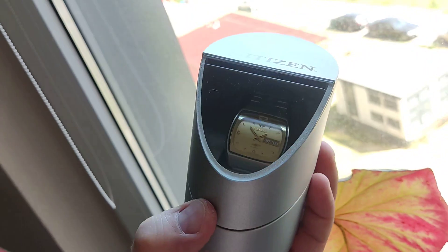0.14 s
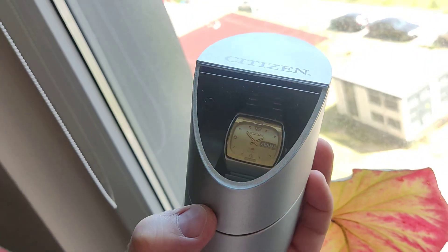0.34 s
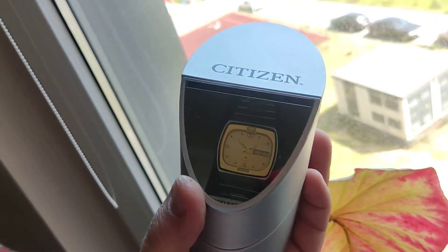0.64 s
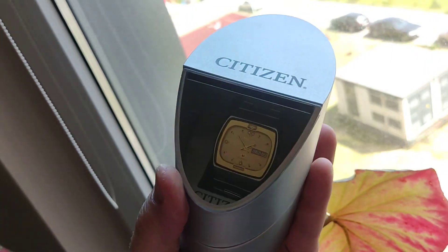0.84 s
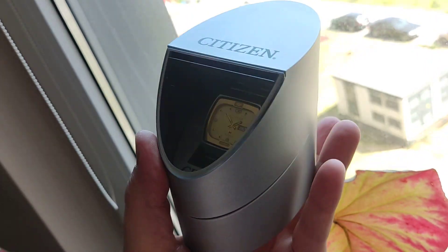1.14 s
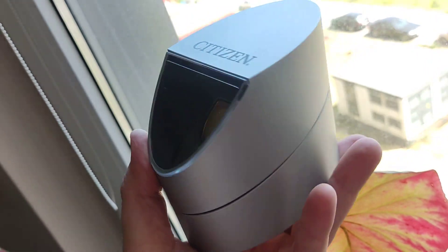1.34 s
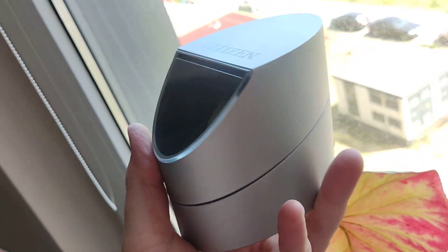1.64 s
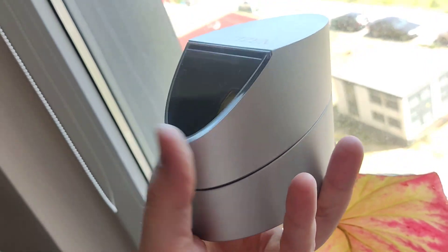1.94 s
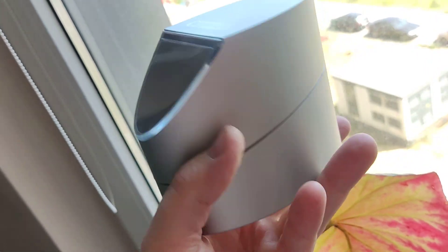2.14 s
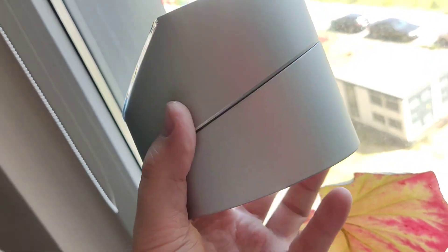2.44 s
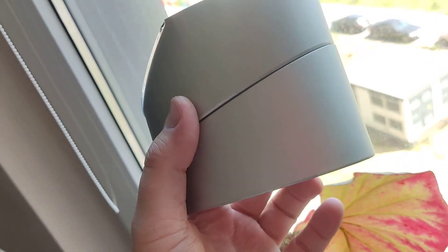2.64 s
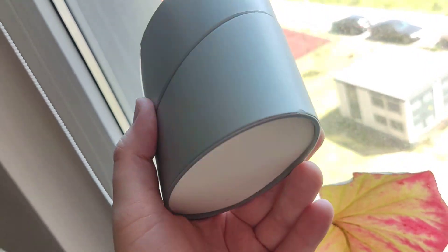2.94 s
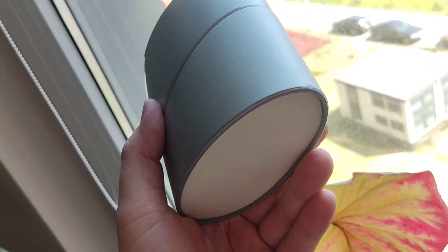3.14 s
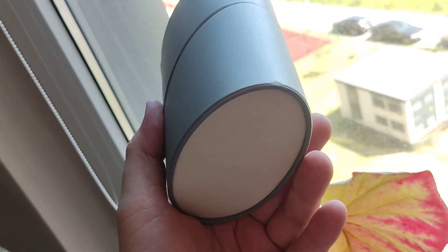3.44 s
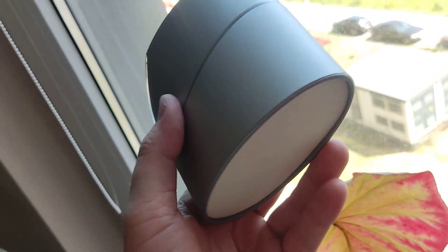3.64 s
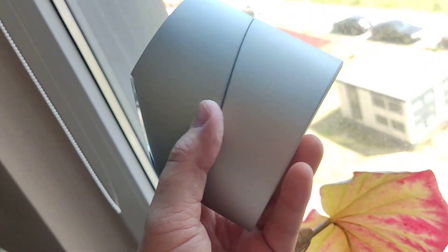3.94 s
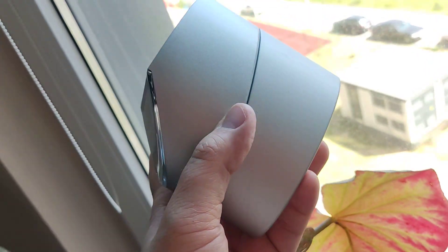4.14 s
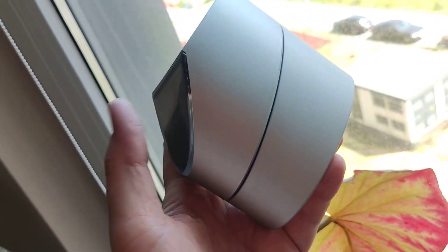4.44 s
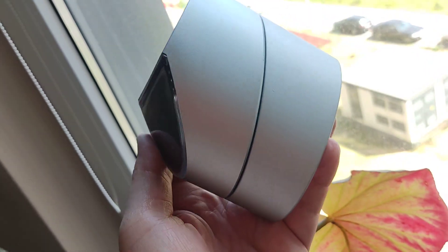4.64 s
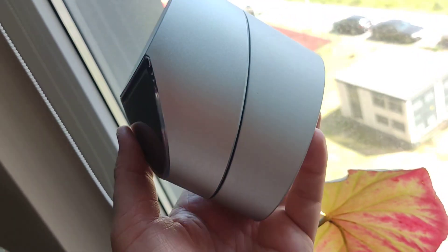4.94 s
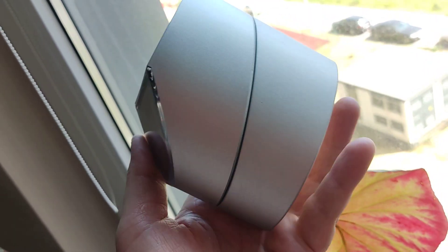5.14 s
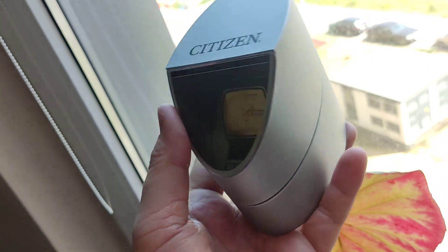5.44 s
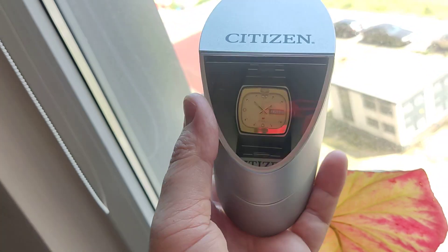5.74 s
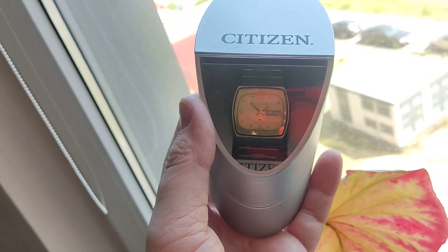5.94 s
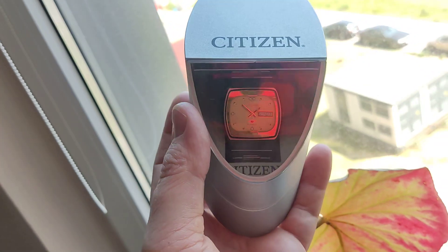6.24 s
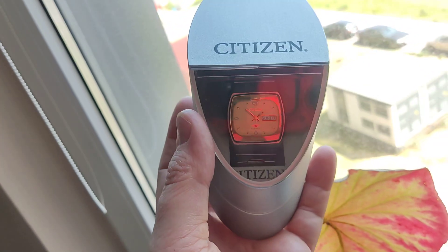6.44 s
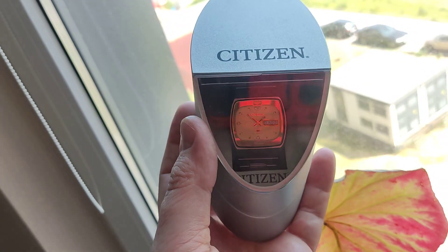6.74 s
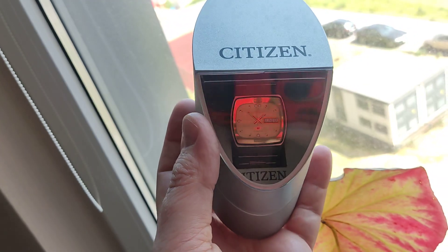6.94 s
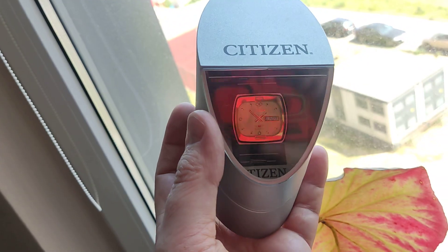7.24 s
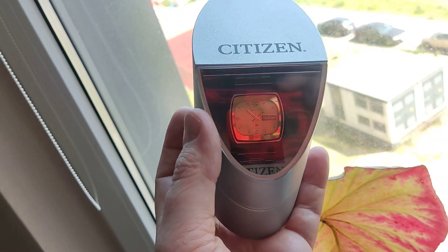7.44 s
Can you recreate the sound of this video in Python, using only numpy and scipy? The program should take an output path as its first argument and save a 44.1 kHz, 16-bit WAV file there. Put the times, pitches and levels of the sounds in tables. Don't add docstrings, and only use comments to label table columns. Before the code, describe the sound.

A small clock ticks fast and slightly unevenly off to the left while dry fingers rub a hollow metal box close by, with one sharp slip.

```python
import sys
import numpy as np
from scipy import signal
from scipy.fft import rfft, irfft, next_fast_len
from scipy.io import wavfile

SR = 44100
rng = np.random.default_rng(int(sys.argv[2]) if len(sys.argv) > 2 else 0)


def wav_record(signal):
    frames = np.transpose(np.atleast_2d(signal))
    bounded = np.clip(frames, -1, 1)
    quanta = np.round(bounded * 32767).astype(np.int16)
    wavfile.write(sys.argv[1], SR, quanta)


def voltage_ratio(level):
    return 10 ** (np.asarray(level, float) / 20)


N = 334713

# order, level_db (rms), left_minus_right_db
HUM_ORDERS = [(1, -59.5, -6), (2, -52.5, 1.5), (3, -69.5, -6), (4, -71, 12), (5, -66, 1), (6, -69, 4.5),
              (7, -73, -1), (8, -75, 0), (9, -85.5, -6), (12, -77.5, 7), (17, -91.5, -27), (28, -83, 15)]
# pitch_hz, level_db (per Hz), left_minus_right_db, left_right_likeness (0 to 1)
ROOM_AIR = [(14.6, -66, 4.5, 0.56), (39.4, -76, 1, 0), (71.5, -81.5, 1, 0.39), (148, -84.5, 4, 0.94),
            (287, -88, -7, 0.84), (474, -93.5, -1.5, 0.19), (1070, -99, 3, 0.47), (1600, -93, 5.5, 0),
            (2560, -100, 7.5, 0), (3660, -106, 3, 0), (6000, -108, -3, 0), (8950, -108, -2.5, 0),
            (13800, -110, 1, 0)]
# time_s, level_db
PALM_CREEP = [(0, -62), (.97, -81), (1.04, -52.5), (1.24, -54.5), (1.4, -64.5), (1.53, -70), (2.6, -75),
              (2.75, -53), (3.05, -61.5), (3.2, -67), (3.32, -61.5), (3.55, -67), (4.5, -68.5), (4.8, -63),
              (5.3, -69), (5.55, -60), (5.701, -72), (7.59, -82)]
# peak_s, level_db, rise_s, fall_s, left_minus_right_db
BRUSHES = [(.125, -49, .06, .05, 5), (.5, -40.5, 0.068, 0.065, 8), (.66, -42.5, 0.086, 0.065, 3),
           (.785, -47, 0.018, 0.027, 8), (.85, -55.5, 0.052, .06, 4), (.915, -50.5, 0.063, 0.041, 8),
           (1.568, -43.5, 0.019, 0.031, 5), (1.745, -40, 0.015, 0.012, 6), (1.95, -54, 0.029, .05, 3),
           (2.13, -52, 0.046, 0.073, 3.5), (2.53, -45.5, 0.064, 0.052, 2.5), (2.81, -50, 0.092, .06, 10.5),
           (2.88, -47, 0.087, 0.069, 8.5), (3.115, -41, 0.043, 0.033, 5), (3.78, -44.5, .15, .1, 4.5),
           (5.42, -67, .04, .03, 1.5)]
# peak_s, level_db, rise_s, fall_s, left_minus_right_db
DRAGS = [(.355, -57, 0.019, 0.11, 2.5), (2.035, -63, 0.019, .05, 4), (2.26, -54, 0.12, .1, 5.5),
         (2.37, -49.5, 0.15, 0.098, 8), (3.97, -54.5, 0.074, 0.084, 9.5), (4.11, -46.5, 0.097, 0.24, 5.5),
         (4.26, -45, 0.088, 0.12, 4.5), (4.59, -51, .04, 0.11, 2), (5.0, -53, 0.085, .15, 10),
         (5.12, -48.5, 0.13, 0.048, 7.5), (6.51, -63.5, 0.087, 0.37, -7)]
# peak_s, level_db, rise_s, fall_s, left_minus_right_db
SLIP = (2.652, -30.5, .002, .115, 11)
# pitch_hz, level_db (per Hz)
BRIGHT_RASP = [(2500, -64), (6000, -52.5), (9000, -42), (12000, -46), (14500, -62.5)]
# pitch_hz, level_db (per Hz)
DULL_RASP = [(400, -35), (1200, -39.5), (2000, -36.5), (4000, -39), (6500, -36), (9000, -59)]
# start_s, level_db (peak)
TICKS = [(0.0861, -36.5), (0.7294, -38), (1.3705, -38.5), (2.0136, -38), (2.658, -40), (3.3038, -39),
         (3.944, -40.5), (4.586, -39), (5.235, -38.5), (5.876, -38.5), (6.5208, -39), (7.166, -39.5)]
# start_s, level_db (peak)
TOCKS = [(0.3539, -38), (1.0001, -38), (1.6426, -37.5), (2.2885, -36), (2.9335, -40.5), (3.5777, -40),
         (4.2214, -40), (4.8648, -38.5), (5.5067, -39.5), (6.1547, -38), (6.8017, -38.5), (7.445, -39.5)]
# pitch_hz, tick_db, tock_db, t60_s, left_minus_right_db
CLOCK_MODES = [(1405, -15, -24, 0.2, 17), (1686, -5.5, -26, 0.049, 19), (1718, -15.5, -16.5, 0.18, 14),
               (1966, -2, -24, 0.03, 13), (2003, -9, -19, 0.17, 15), (2110, -26, -39, 0.076, -2),
               (2276, -3.5, -8, 0.091, 20.5), (2290, -15, -7, 0.082, 17.5), (2388, -5, -6.5, 0.056, 23),
               (2520, -7, -19, 0.049, 9), (2573, -21, -10, 0.049, 21), (2745, -16, -9, 0.046, 19),
               (3800, -23, -6, 0.023, 16), (4170, -12.5, -17, 0.019, 27.5), (4840, -8.5, -17, 0.024, 18),
                  (5440, -12.5, -7, 0.019, 16), (6080, -13.5, -10.5, 0.038, -7),
                  (7100, -17, -11.5, 0.029, 22), (7690, -18, -10, 0.015, 12), (7700, -16, -6.5, 0.039, 30),
                  (8400, -23, -4, 0.022, 2), (8000, -15.5, -17, 0.033, 7), (8570, -29, -8, 0.017, -5.5),
                  (9370, -8.5, -9, 0.038, 8), (10400, -10, -35, 0.035, 10), (11100, -11, -19, 0.024, 0)]
# after_blow_s, tick_db, tock_db
REBOUNDS = [
    (-.0035, -15, -30),
    (0, 0, 0),
    (.006, -5, -6),
    (.0205, -16, -7),
    (.027, -8, -15),
    (.042, -13, -13),
]
# start_s, level_db (peak), left_minus_right_db, length_s
SNAPS = [(0.34, -24, -6, 0.013), (0.461, -28, 11, 0.016), (0.594, -27, 7, 0.012), (0.772, -31, 5.0, 0.012),
         (0.864, -43, 5.0, 0.012), (1.574, -26, 10, 0.012), (1.737, -18, 13, 0.0058),
         (1.813, -32, 7, 0.014), (1.883, -37, 13, 0.011), (1.922, -27.5, 3, 0.012),
         (2.229, -21.5, 5.0, 0.012), (2.468, -33, 5.0, 0.012), (2.649, -20, 12, 0.0078),
         (2.658, -26, -1, 0.011), (3.095, -19.5, 11, 0.02), (4.583, -36, 11, 0.012)]
# pitch_hz, width_hz, level_db
SHELL_MODES = [(1600, 340, -3.5), (2470, 350, 4), (3000, 2000, -6), (4010, 330, 5), (5700, 3500, -17.5),
               (6430, 220, 0.5), (7570, 810, -6.5), (8370, 180, 5.5), (9170, 560, -0.5), (9770, 280, 4),
               (10070, 160, 3), (10310, 170, -1.5), (10710, 230, -4), (11640, 300, 2), (13400, 960, 5.5),
               (14000, 840, 5), (13800, 420, -4)]
# start_s, level_db (peak), pitch_hz, t60_s
KNOCKS = [
    (1.375, -60, 890, 0.059),
    (1.93, -59.5, 856, 0.021),
    (2.3, -57, 667, 0.046),
    (2.34, -60, 745, 0.03),
    (2.6507, -48, 776, 0.012),
    (2.969, -60, 1165, 0.053),
    (6.689, -61, 1120, 0.05),
    (6.885, -57, 905, 0.035),
]
# pitch_hz, width_hz, lift_db
PORTS = [
    (10390, 1130, 10.5),
    (8260, 840, 11.5),
]


def pan(left_minus_right_db):
    return voltage_ratio(np.array([left_minus_right_db, -left_minus_right_db]) / 2)


def band(x, order, low_hz, high_hz):
    return signal.sosfilt(signal.butter(order, [low_hz, high_hz], "band", fs=SR, output="sos"), x)


def lowpass(x, order, cut_hz):
    return signal.sosfilt(signal.butter(order, cut_hz, fs=SR, output="sos"), x)


def coloured(white, spectrum):
    table_hz, table_db = np.transpose(spectrum)[:2]
    size = next_fast_len(N, True)
    hz = np.maximum(np.arange(size // 2 + 1) * SR / size, 1)
    gain = voltage_ratio(np.interp(np.log(hz), np.log(table_hz), table_db)) * np.sqrt(SR / 2)
    return irfft(rfft(white, size) * gain, size)[..., :N]


def drift(rate_hz):
    r = np.exp(-16 * np.pi * rate_hz / SR)
    white = rng.standard_normal(N // 8 + 5002)
    slow = signal.lfilter([1], [1, -2 * r, r * r], white)[5000:]
    return np.interp(np.arange(N) / 8, np.arange(len(slow)), slow / slow.std())


def ring(clicks, hz, t60_s):
    r = voltage_ratio(-60 / (t60_s * SR))
    w = 2 * np.pi * hz / SR
    return signal.lfilter([0, np.sin(w)], [1, -2 * r * np.cos(w), r * r], clicks + 1e-18)


def resonance(x, hz, width_hz):
    r = np.exp(-np.pi * width_hz / SR)
    w = 2 * np.pi * hz / SR
    return signal.lfilter([(1 - r * r) / 2, 0, (r * r - 1) / 2], [1, -2 * r * np.cos(w), r * r], x)


def hum():
    mains_hz = 49.987
    turn = 2 * np.pi * mains_hz * np.arange(N) / SR
    out = np.zeros((2, N))
    for order, db, side_db in HUM_ORDERS:
        sine = np.sin(order * turn + 2 * np.pi * rng.random())
        out += np.sqrt(2) * voltage_ratio(db) * pan(side_db)[:, None] * sine
    return out


def air():
    mid, side = rng.standard_normal((2, N))
    hz, db, side_db, alike = np.transpose(ROOM_AIR)
    alike = np.clip(alike, 0, .98)
    out = []
    for way in (1, -1):
        level = db + way * side_db / 2 - 4.5
        shared = coloured(mid, np.c_[hz, level + 10 * np.log10(1 + alike)])
        apart = coloured(side, np.c_[hz, level + 10 * np.log10(1 - alike)])
        out.append(shared + way * apart)
    return np.array(out) * voltage_ratio(1.2 * drift(2.7))


def stroke_power(strokes, shape):
    edge_db = 24
    out = np.zeros((2, N))
    for s, db, rise, fall, side_db in strokes:
        first = max(int((s - 2 * rise) * SR), 0)
        last = min(int((s + 3 * fall) * SR), N)
        near = np.arange(first, last)
        t = near / SR - s
        away = np.where(t < 0, -t / rise, t / fall)
        out[:, near] += (pan(side_db)[:, None] * voltage_ratio(db - edge_db * away ** shape)) ** 2
    return out


def fingers():
    stroke_shape, skid_shape = 2.07, 0.78
    dull_db = -6, -6.5, -3.5
    dull_lag = 0.37
    creep_db = np.interp(np.arange(N) / SR, *np.transpose(PALM_CREEP))
    creep = (pan(2)[:, None] * voltage_ratio(creep_db)) ** 2
    light = stroke_power(BRUSHES, stroke_shape) + stroke_power([SLIP], skid_shape)
    firm = stroke_power(DRAGS, stroke_shape)
    touches = creep, light, firm
    bright = sum(touches)
    dull = sum(voltage_ratio(2 * db) * power for db, power in zip(dull_db, touches))
    dull = dull * (bright.mean(axis=0) / voltage_ratio(-120)) ** -dull_lag
    clumps = voltage_ratio(1.8 * drift(115) + 1.68 * drift(22.5))
    bright_grains, dull_grains = rng.standard_normal((2, 2, N)) * clumps
    bright_rasp = np.sqrt(bright) * pan(0.95)[:, None] * coloured(bright_grains, BRIGHT_RASP)
    dull_rasp = np.sqrt(dull) * pan(2.2)[:, None] * coloured(dull_grains, DULL_RASP)
    return bright_rasp + dull_rasp


def loose_rattle():
    t = np.arange(int(.12 * SR)) / SR
    rattle = np.zeros(N + SR)
    for s, db in TICKS + TOCKS:
        contacts = (rng.random(len(t)) < 900 / SR) * rng.standard_normal(len(t))
        rattle[int(s * SR):][:len(t)] += voltage_ratio(db - 23 - 60 * t / 0.22) * contacts
    return lowpass(rattle, 1, 3000)


def clock():
    out = np.zeros((2, N))
    rattle = loose_rattle()
    for hz, *mode_db, t60_s, side_db in CLOCK_MODES:
        clicks = rattle * voltage_ratio(np.mean(mode_db))
        for kind, beats in enumerate((TICKS, TOCKS)):
            s, db = np.transpose(beats)
            for after_s, *blow_db in REBOUNDS:
                uneven_db = 1.7 * rng.standard_normal(len(s))
                sign = rng.choice([-1, 1])
                level_db = db + mode_db[kind] + blow_db[kind] + uneven_db - 12.5
                clicks[((s + after_s) * SR).astype(int)] += sign * voltage_ratio(level_db)
        out += pan(side_db)[:, None] * ring(clicks[:N], hz, t60_s)
    lag = int(.0075 * SR)
    out[1, lag:] += voltage_ratio(-11) * out[0, :-lag]
    return out


def beat_decay(length_s, level_db, t60_s):
    envelope = np.zeros(N + SR)
    t = np.arange(int(length_s * SR)) / SR
    for s, db in TICKS + TOCKS:
        envelope[int(s * SR):][:len(t)] += voltage_ratio(db + level_db - 60 * t / t60_s)
    return envelope[:N]


def crack():
    noise = beat_decay(.03, -18.0, .03) * rng.standard_normal((2, N)) * pan(7.6)[:, None]
    return band(noise, 1, 1500, 7000)


def shimmer():
    noise = rng.standard_normal((2, N)) * pan(4.0)[:, None]
    steel = band(beat_decay(.2, -24, .65) * noise, 2, 6500, 12000)
    panel = band(beat_decay(.2, -26, .16) * noise, 2, 1600, 2700)
    return steel + 2 * panel


def snaps():
    envelope = np.zeros((2, N))
    t = np.arange(SR // 4) / SR
    for s, db, side_db, length_s in SNAPS:
        burst = voltage_ratio(db - 22.5) * pan(side_db)[:, None] * np.exp(-t / length_s)
        envelope[:, int(s * SR):][:, :len(t)] += burst
    crackle = rng.standard_normal((2, N)) * voltage_ratio(1.0 * drift(440))
    return band(envelope * crackle, 1, 4000, 11000)


def box(touch):
    out = voltage_ratio(-8) * touch
    for k, (hz, width_hz, db) in enumerate(SHELL_MODES):
        grip = voltage_ratio(db + 3.03 * drift(13.2))
        out = out + (-1) ** k * grip * resonance(touch, hz, width_hz)
    return out


def nail_tap():
    spike = np.zeros(N)
    spike[int(1.0765 * SR)] = voltage_ratio(-25)
    return band(spike, 1, 3000, 9000)


def knocks():
    out = np.zeros(N)
    for s, db, hz, t60_s in KNOCKS:
        clicks = np.zeros(N)
        clicks[int(s * SR):][:300] = voltage_ratio(db - 18.0) * rng.standard_normal(300)
        neighbours = ring(clicks, 0.95 * hz, .5 * t60_s) - ring(clicks, 1.49 * hz, .5 * t60_s)
        out += ring(clicks, hz, t60_s) + voltage_ratio(-14.0) * neighbours
    return out * pan(3.2)[:, None]


def thump():
    push = np.zeros(N)
    push[int(7.4845 * SR)] = voltage_ratio(-33)
    push = ring(push, 310, .014) + voltage_ratio(-11) * ring(push, 115, .15)
    return lowpass(push, 2, 550)


def room(x):
    t60_s, wall_cut_hz = 0.29, 9300
    t = np.arange(int(.6 * SR)) / SR
    tail = rng.standard_normal((2, len(t))) * (t > .008)
    dull = lowpass(tail, 1, wall_cut_hz)
    tail = dull * voltage_ratio(-60 * t / t60_s) + (tail - dull) * voltage_ratio(-60 * t / (0.84 * t60_s))
    tail /= np.sqrt(np.sum(tail ** 2, axis=1, keepdims=True))
    return signal.fftconvolve(x.mean(axis=0)[None], tail, axes=1)[:, :N]


def scene():
    far = clock() + crack() + shimmer()
    near = box(fingers() + snaps()) + nail_tap() + knocks() + thump()
    return hum() + air() + far + near + room(voltage_ratio(-7.5) * far + voltage_ratio(-11.5) * near)


def low_pass(x):
    return signal.sosfilt(signal.butter(12, 14500, fs=SR, output="sos"), x)


def record(dry):
    out = []
    for channel, (hz, width_hz, lift_db) in zip(dry, PORTS):
        out.append(channel + (voltage_ratio(lift_db) - 1) * resonance(channel, hz, width_hz))
    return low_pass(np.array(out))


dry = scene()
out = record(dry)
wav_record(out)
```